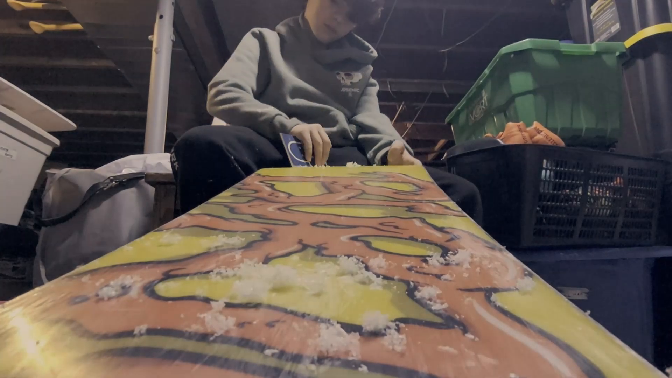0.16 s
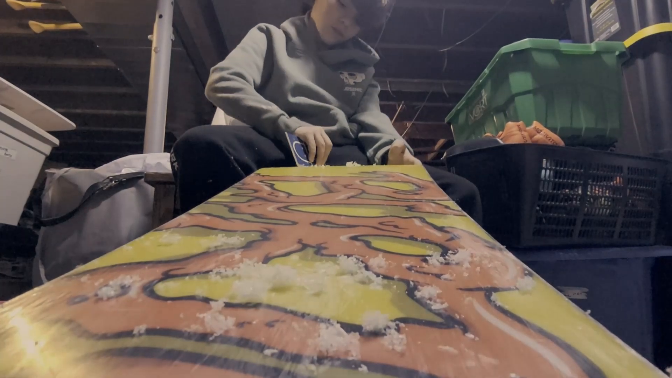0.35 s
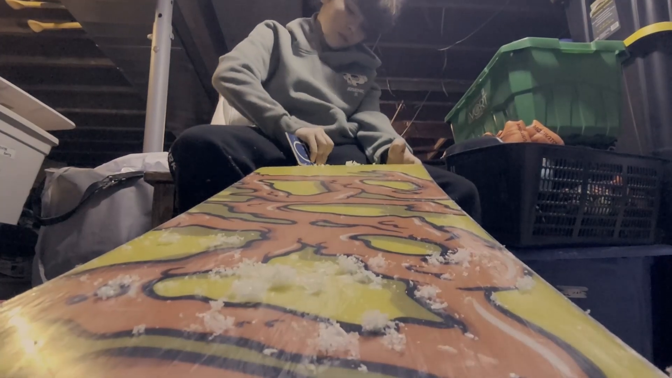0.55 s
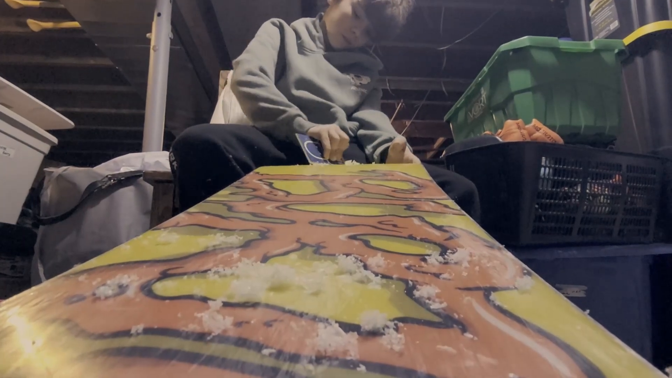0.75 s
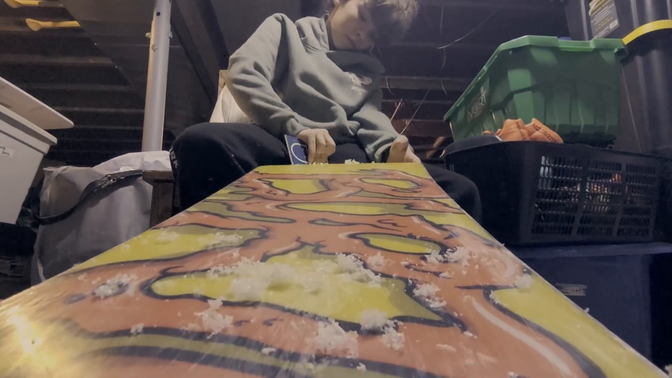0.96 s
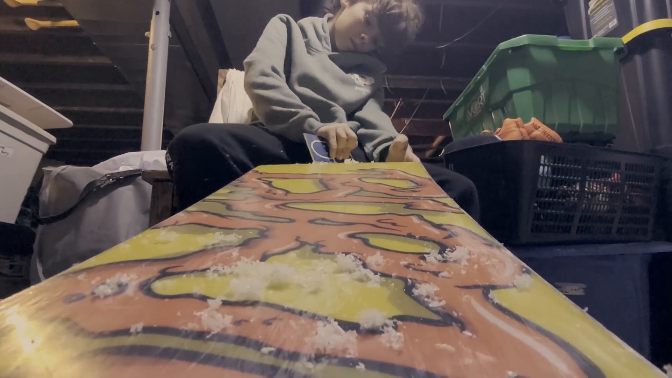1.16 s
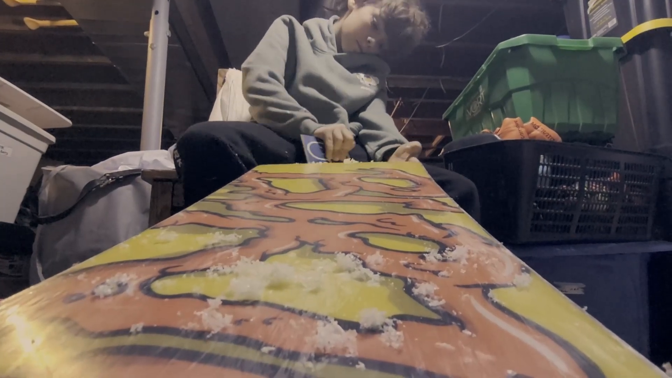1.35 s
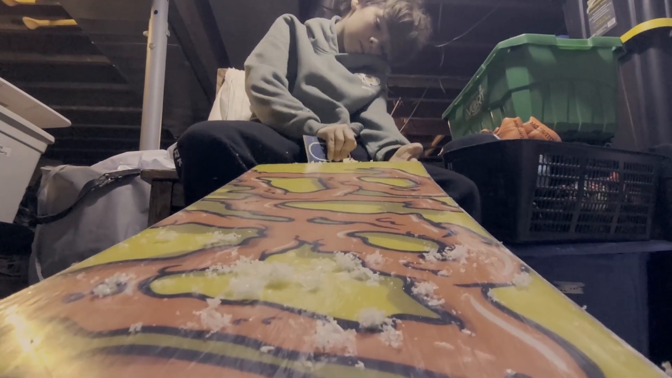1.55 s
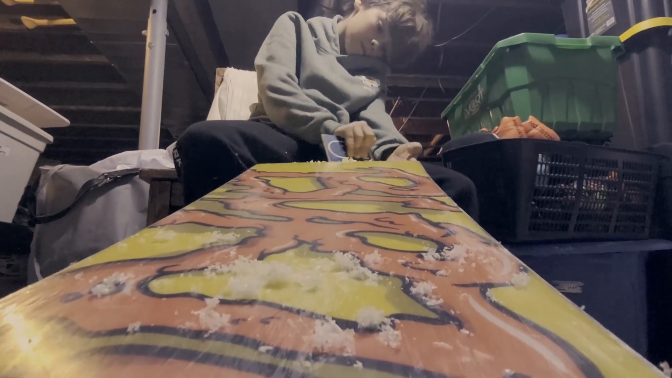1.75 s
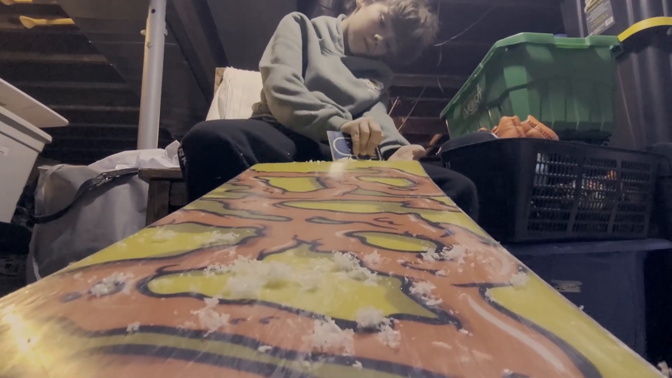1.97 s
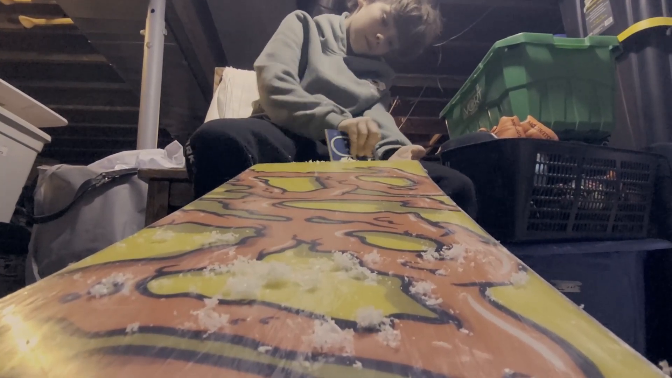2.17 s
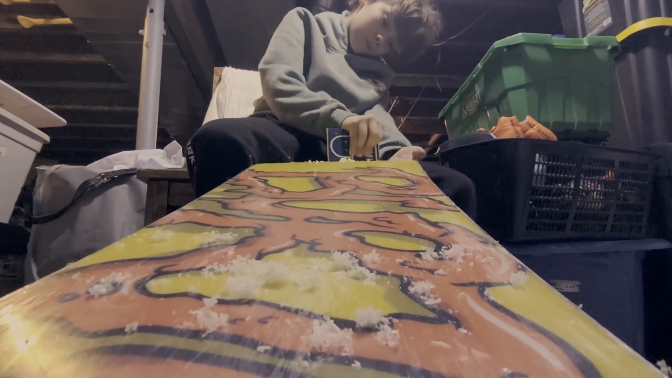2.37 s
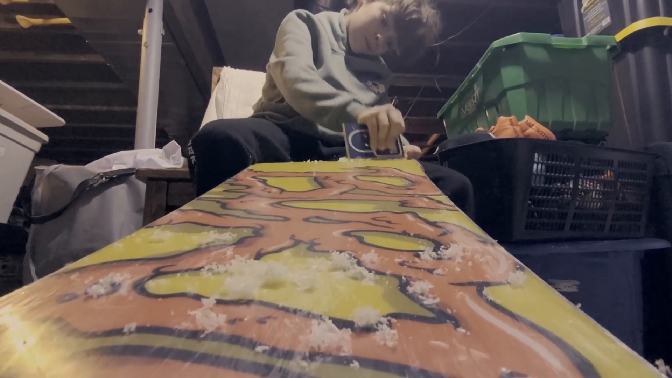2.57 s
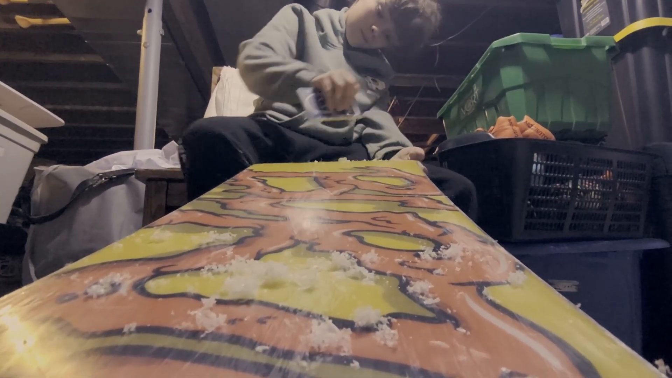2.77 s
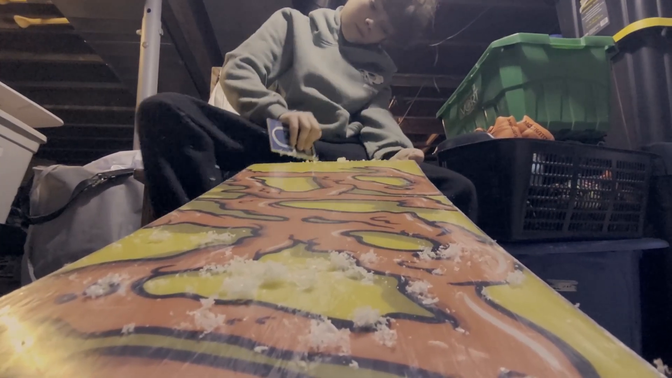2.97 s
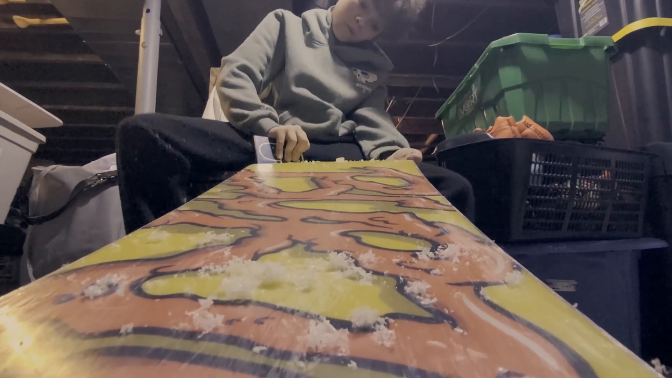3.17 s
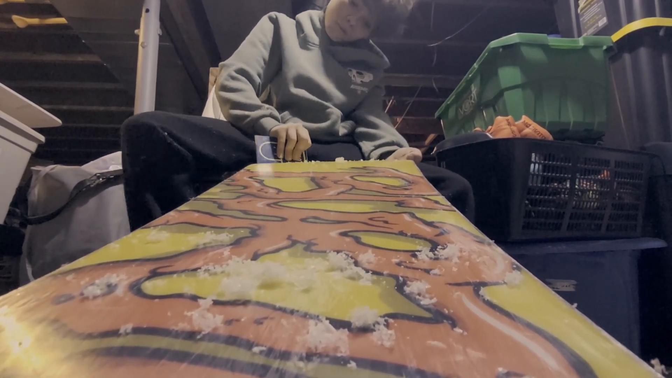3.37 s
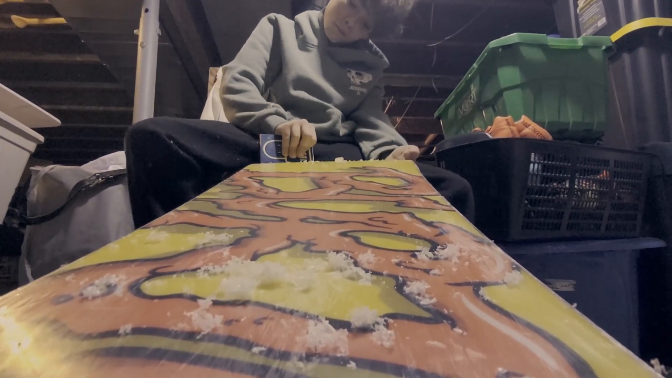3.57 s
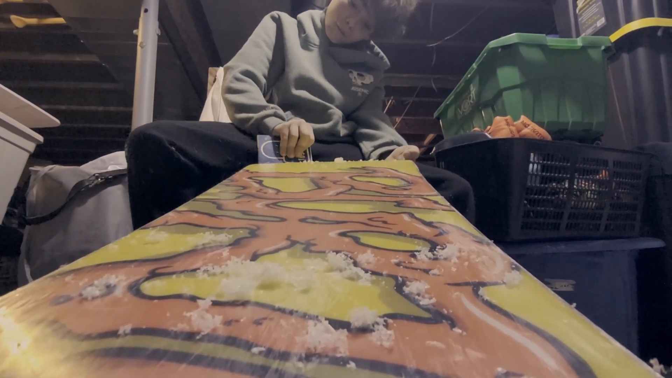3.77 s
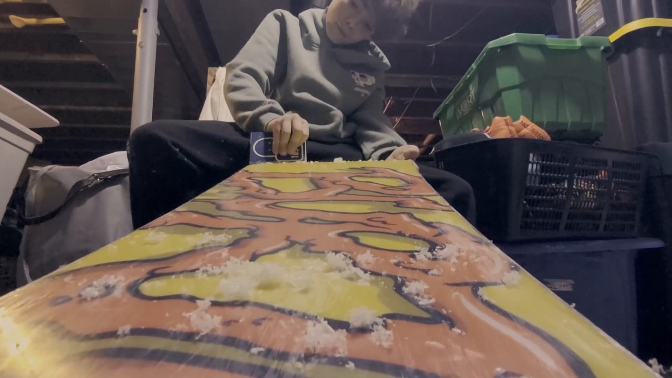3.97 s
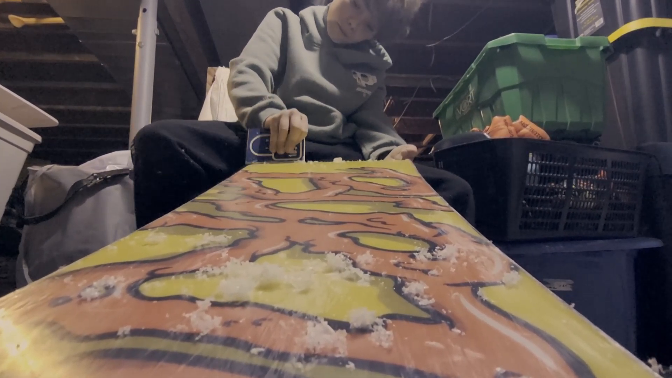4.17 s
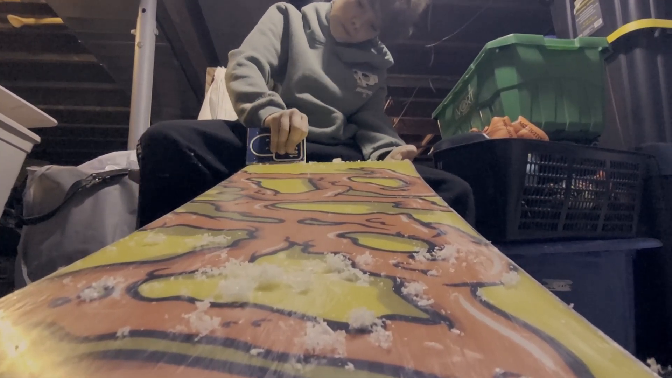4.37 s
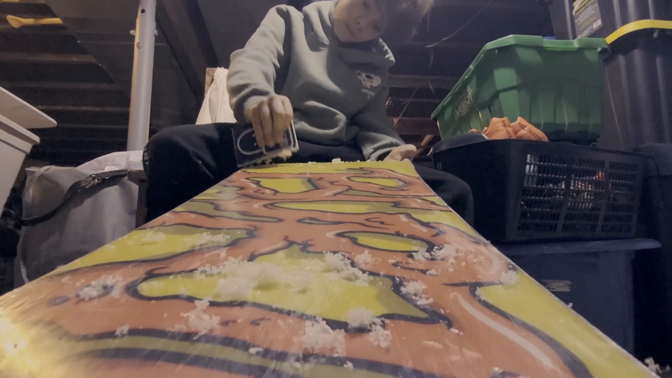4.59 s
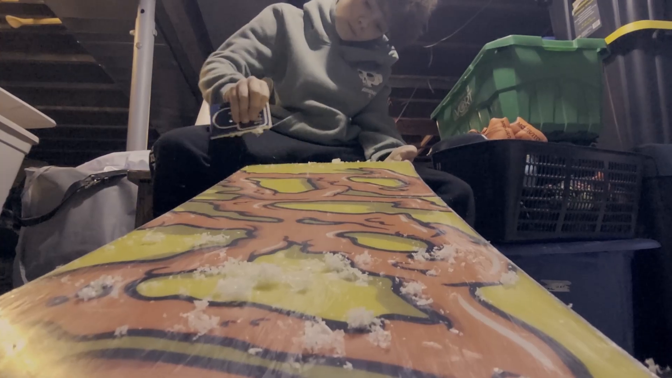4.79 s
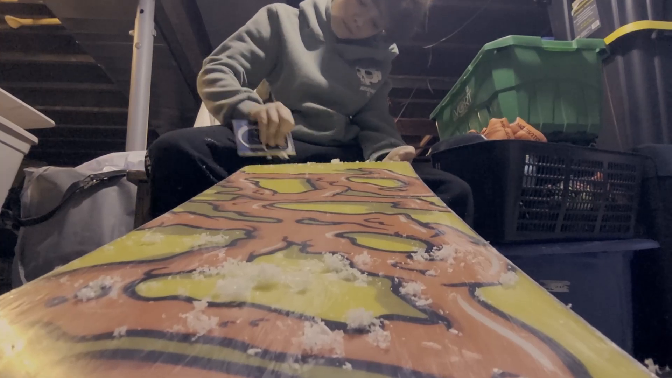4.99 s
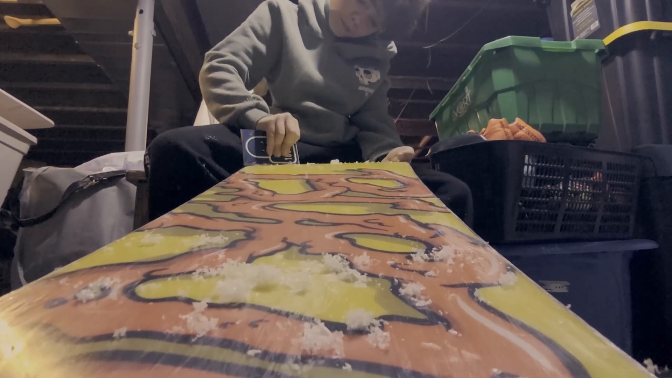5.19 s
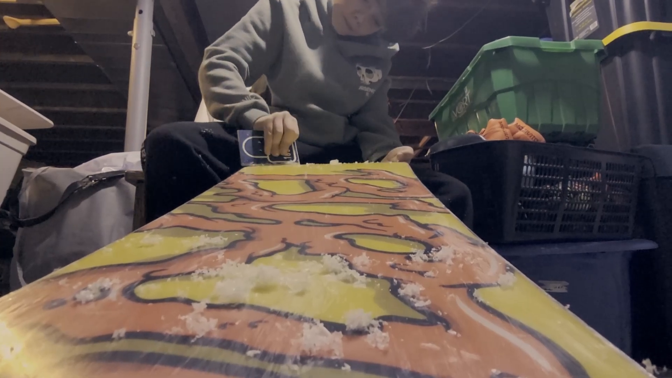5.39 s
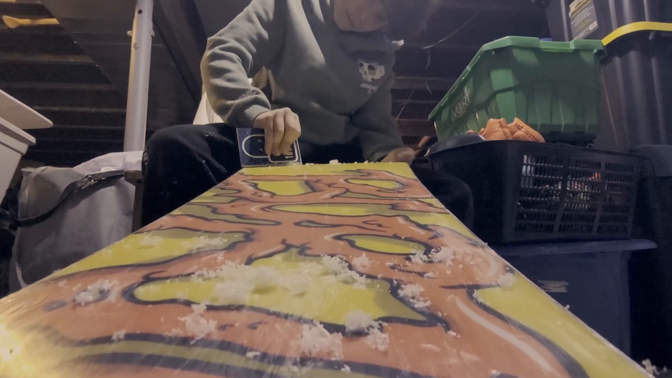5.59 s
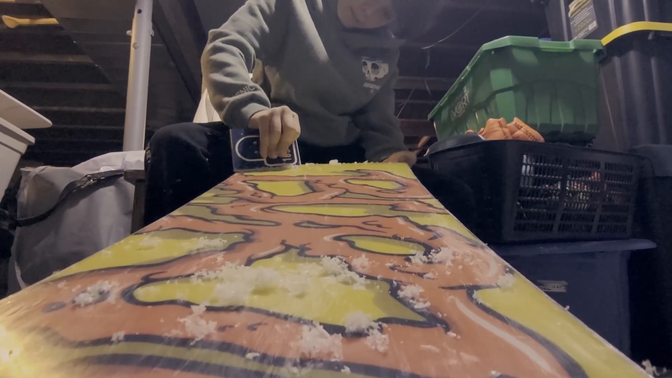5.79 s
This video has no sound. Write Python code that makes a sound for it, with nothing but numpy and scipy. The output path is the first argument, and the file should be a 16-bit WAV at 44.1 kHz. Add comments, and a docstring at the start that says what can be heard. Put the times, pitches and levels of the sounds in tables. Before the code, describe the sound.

Dry, hollow scraping strokes on a waxy board swell, fade and return rougher, with two sharp clacks between them.

```python
"""A plastic scraper is worked back and forth over the waxed base of a snowboard in a garage.
Small knocks and faint strokes at the board's edge come first, then strong strokes towards its middle.
Light strokes lead to a hard knock at 3.1 s as the scraper is set down; the work then moves back to the edge.
A second hard knock at 5.1 s precedes the last strokes. Stick-slip friction drives the blade's rasp, the hiss
of flakes and the board's ringing and rocking; blows, cracking wax, room echo and air are added to it."""
import sys
import numpy as np
from scipy import signal
from scipy.fft import rfft, irfft, next_fast_len
from scipy.io import wavfile
from scipy.ndimage import uniform_filter1d, map_coordinates

SR = 44100
rng = np.random.default_rng(int(sys.argv[2]) if len(sys.argv) > 2 else 0)


def dump(signal):
    """Clip the signal to [-1, 1] and save it as 16-bit WAV at the path in sys.argv[1]."""
    limited = np.clip(np.atleast_2d(signal).T, -1, 1)
    pcm = np.round(limited * 32767).astype(np.int16)
    wavfile.write(sys.argv[1], SR, pcm)


N = 257534  # samples

# Levels in the tables are relative, ahead of layer gains and microphone-port gains.
# steady room noise: hz, level_db
AIR_SPECTRUM = [(15, -44), (25, 2), (80, -5.5), (531, -17.5), (775, -19), (1130, -24.5), (2280, -23.5),
                (2840, -17), (4490, -20), (16000, -35.5)]
# reverberation of the garage: hz, t60_s
GARAGE_DECAY = [(100, 0.8), (500, 0.35), (2000, 0.27), (6000, 0.26), (14000, 0.25)]
# the two microphone ports: hz, coherence, left_over_right_db, left_lead_rad
PORT_RELATIONS = [(40.24, 0.36, -12.5, -1), (99, 0.71, -11.5, 1.75), (203, 0.26, -4, -1.5),
                  (322, 0.97, 2, -1.23), (460, 0.94, 5.5, -0.3), (750, 0.9, 2, 0.6), (1140, 0.8, 2.5, 2),
                  (1700, 0.24, 4.5, 2.5), (2400, 0.69, 6, 1.5), (3400, 0.19, 11.5, 1.8),
                  (4060, 1, 12.5, 1.56), (7000, .15, 3.5, 1.5), (10000, 0.11, 5.5, -0.9),
                  (14000, .1, -4, 8.5)]
# the board tips on its supports under the hand: start_s, level_db, pitch_hz
SUPPORT_THUMPS = [(.107, -35.5, 333), (.124, -43, 188), (0.284, -44.5, 106), (.695, -31, 113),
                  (.765, -40, 75.4), (1.395, -38, 111), (1.725, -29, 120), (1.79, -39.5, 45),
                  (2.055, -40, 65.5), (2.325, -36, 46.4), (3.69, -40, 75), (3.885, -34.5, 115.6),
                  (4.175, -29.5, 117), (4.454, -32, 81)]
# the slowly moving blade stutters: start_s, length_s, level_db, slips_per_s, pitch_hz
STUTTERS = [(3.363, .07, -44, 70, 1750), (3.476, .05, -46.5, 70, 1770), (4.635, .11, -51.5, 69, 736)]
# wax chips snap off: start_s, peak_db, pitch_hz
WAX_CHIPS = [(1.577, -16.5, 11200), (1.577, -17.5, 2380), (2.168, -27, 11100), (2.325, -40, 8950),
             (2.326, -30.5, 3500), (2.658, -50.5, 12000), (3.110, -38.5, 5850), (3.146, -40, 5500),
             (3.211, -42, 7000), (3.982, -50, 5970), (4.021, -42, 5980), (4.239, -40.5, 6000),
             (4.716, -41.5, 2000), (4.778, -50, 2500), (4.789, -42, 2500), (5.083, -30.5, 4920),
             (5.095, -40, 9100)]
# the scraper strikes the board: start_s, level_db, contact_cutoff_hz, boom_db, clatter_db,
# free_share (of each mode's t60, left by the damping hands)
BLOWS = [(0.089, -45.5, 900, -11, 5, 0.93), (0.11, -33, 450, -8, 10, 0.58), (0.159, -41, 400, -5, 8, 0.97),
         (0.271, -37, 550, -10, 9.5, 0.29), (3.1093, -11, 2130, -29, -19, 0.56),
         (3.21, -40, 600, 15, 4.5, 1), (3.981, -47.5, 3640, -18.5, 12, .7),
         (4.039, -31, 1520, -33, -5, 0.74), (4.298, -40, 1110, -19.5, -1.5, 0.93),
         (4.399, -25.5, 1510, -19, -1.5, 0.62), (4.441, -19.5, 1520, -11, -0.5, 0.49),
         (4.564, -37.5, 1190, -29.5, 5, 0.79), (5.0843, -13, 2600, 0, -2.5, 0.76),
         (5.105, -24, 1090, 7, -10, 0.78)]
# modes of the struck board: hz, middle_db, edge_db, t60_s (undamped by the hands)
STRUCK_MODES = [(78, -19.5, 6, 0.27), (120, -17, 10.5, 0.36), (188, -17, -1.5, 0.18),
                (212, -28.5, -3.5, 0.56), (293, -20, -7, 0.43), (364, -12.5, 5.5, 0.11),
                (448.5, -2, 1, 0.16), (591, -3.5, -10, 0.16), (704, -13.5, -1.5, 0.14),
                (768, -7.5, 3, 0.19), (840, -33.5, -5.5, 0.11), (1008, -23, 6.5, 0.091),
                (1143, -8, 10.5, 0.082), (1490, -5.5, -27, 0.12), (1680, -3.5, -11.5, 0.055),
                (2030, -18, -0.5, 0.14)]
# the board's dense higher modes: hz, t60_s
CLATTER_DECAY = [(300, 0.22), (900, .13), (2000, 0.061), (6000, 0.087), (14000, 0.15)]
# scraper strokes, pushes and lighter returns: start_s, rise_s, fall_s, rasp_db, ring_db, rock_db, hiss_db,
# bite_hz (band favoured by the blade's angle), spot_hz (band fed by the contact spot)
SCRAPER_STROKES = [(0.078, 0.018, 0.073, -49.5, -48, -53.5, -60, 2800, 350),
                   (0.15, 0.008, 0.11, -57.5, -55.0, -57, -69.5, 2500.0, 330.0),
                   (0.248, 0.03, 0.18, -56, -51.5, -54.5, -69.5, 2820, 335),
                   (0.545, 0.045, 0.07, -48, -46.5, -58, -83, 2110, 483),
                   (0.63, 0.12, 0.099, -34, -32.5, -39, -59.5, 2400, 460),
                   (0.85, 0.11, 0.056, -38.0, -44.0, -55, -56.5, 2480, 460),
                   (1.029, 0.074, 0.12, -28, -31.5, -46, -52.5, 2400, 1130),
                   (1.205, 0.086, 0.053, -38, -41, -44.5, -58, 2620, 467),
                   (1.336, 0.052, 0.094, -28.5, -35, -45, -54, 2400, 484),
                   (1.487, 0.064, 0.068, -41.5, -40.5, -48, -60.5, 1870, 454),
                   (1.62, 0.084, 0.068, -26.5, -31.5, -41.5, -55, 3360, 470),
                   (1.763, 0.076, 0.061, -37.0, -43.5, -49, -56, 4080, 460),
                   (1.895, 0.078, 0.064, -25, -35, -49, -51, 3650, 483),
                   (2.037, 0.077, 0.043, -34.0, -45, -56, -55, 3700, 500),
                   (2.155, 0.058, 0.12, -27.5, -36.5, -52.5, -54.5, 3650.0, 540),
                   (2.3, 0.12, 0.027, -37, -45.5, -55.5, -59, 3400, 530),
                   (2.469, 0.038, 0.14, -29, -36, -48, -51, 3700, 790),
                   (2.645, 0.11, 0.087, -51.5, -56, -68, -66.5, 3520, 790),
                   (2.819, 0.024, 0.084, -61, -59.0, -72, -69, 3560, 780.0),
                   (2.931, 0.015, 0.036, -65, -52, -60, -50.5, 3520, 785),
                   (2.955, 0.0088, 0.16, -60.5, -57.5, -73, -62.5, 3500.0, 784),
                   (3.178, 0.032, 0.11, -60, -57.5, -58.5, -74, 3020, 483),
                   (3.33, 0.031, 0.064, -59.5, -55, -65, -78, 2500, 480),
                   (3.462, 0.025, 0.028, -65, -64, -70.5, -83, 2500, 480),
                   (3.517, 0.037, 0.094, -39.5, -34.5, -57, -72.5, 2730, 487),
                   (3.555, 0.076, 0.083, -33.5, -36, -49, -63.5, 2220, 497),
                   (3.705, 0.069, 0.046, -53, -53, -58, -77.5, 2470, 503),
                   (3.815, 0.047, 0.1, -34.5, -36, -40.5, -58, 3280, 490),
                   (3.965, 0.07, 0.053, -47.5, -49, -47.5, -70.5, 2600, 1080),
                   (4.097, 0.052, 0.09, -34, -38, -34, -58.5, 1930, 900),
                   (4.225, 0.057, 0.092, -49.5, -50, -46.5, -71.5, 2180, 800),
                   (4.383, 0.018, 0.078, -38, -37, -34, -68.5, 1600, 780),
                   (4.43, 0.083, 0.048, -41.5, -48.5, -42.5, -63.5, 2900, 700),
                   (4.635, 0.12, 0.13, -59.5, -61, -85.5, -82.5, 2660, 480.0),
                   (4.874, 0.039, 0.074, -70.5, -81, -81.5, -74, 2700.0, 477),
                   (5.242, 0.048, 0.051, -75, -73, -72, -70.5, 2700.0, 450.0),
                   (5.318, 0.054, 0.22, -42, -46, -41, -62, 2700, 430),
                   (5.47, 0.019, 0.21, -58.5, -62.5, -62, -61.5, 2680, 477),
                   (5.639, 0.067, 0.17, -44, -43.5, -38.5, -62, 2520, 530),
                   (5.745, 0.098, 0.08, -35, -35.5, -46, -59.5, 3100.0, 520.0)]
# where the blade works: time_s, edge_share (0 = middle of the board, 1 = its edge)
CONTACT_PATH = [(0, 1), (.6, 0.22), (3.6, 0.068), (4.1, 0.97), (5.8, 0.63)]
# the grip changes for a moment in uneven wax: peak_s, extra_db, spread_s (standard deviation)
GRIP_CHANGES = [(0.74, 2, .004), (1.082, 4.5, .01), (1.299, 4, .009), (1.365, 8.5, 0.0025),
                (1.698, 2.5, 0.0044), (1.824, 6, 0.0024), (2.01, -3, 0.00475), (2.378, 5, 0.0029),
                (2.537, 5, .01), (3.556, 4, 0.0013), (4.04, 8.5, 0.0026), (4.057, 3, .003),
                (4.116, 6.5, 0.005), (4.199, 2.5, 0.0027), (4.164, 9, 0.0023), (4.451, -1, .004),
                (5.343, 3, .005), (5.507, 8, 0.008)]
# resonances of the board under the blade, middle and edge: hz, width_hz, level_db
MIDDLE_RESONANCES = [(290, 20, -16.5), (451.5, 21.6, 5.5), (545, 28, -6), (568, 25, -5.5),
                     (679.6, 24, -7.5), (787, 35, -3), (1012, 38, -13.5), (1112, 56, -8)]
EDGE_RESONANCES = [(307, 220, -3), (386, 27, 1.5), (420, 29, 3), (578.4, 96, -0.5), (740.5, 30, -1.5),
                   (864, 91, -10), (1000, 34, -7.5), (1174, 87, -9.5)]
# resonances of the blade: hz, width_hz, level_db
BLADE_RESONANCES = [(1510, 77, -6), (1890, 110, -12), (2460, 23, 3.5), (2500, 110, -1), (3260, 28, -5),
                    (3570, 47, -10), (3280, 37, -19.5), (4060, 50, -12), (5430, 83, -15.5)]
# slow bending modes of the whole board: hz, width_hz, level_db
BENDING_MODES = [(44.1, 28, -1.5), (79, 18.2, 1.5), (117, 20.7, -1), (178.3, 76, -9)]
# friction spectra of the rasp at middle and edge, of the hiss, the ring and the rocking: hz, level_db
RASP_MIDDLE_SPECTRUM = [(600, -17.5), (1100, -9.5), (1400, 1.5), (2300, 1.5), (3300, -1), (4300, -4.5),
                        (5300, -4.5), (6100, -19), (7400, -15), (8500, -36), (12000, -53.5)]
RASP_EDGE_SPECTRUM = [(600, -16.5), (1100, 0), (1400, -4.5), (2200, -5), (3300, -5.5), (4300, -9),
                      (5300, -10), (6100, -19), (7400, -24.5), (8500, -33.5), (12000, -50)]
HISS_SPECTRUM = [(1500, -2.5), (4000, -2.5), (6500, 2), (8600, -9), (10500, -4), (13000, -2.5), (15800, -6)]
RING_SPECTRUM = [(80, -50.5), (230, 5), (380, -6), (1200, 4.5), (1700, -9), (3000, -56.5)]
ROCK_SPECTRUM = [(20, -22.5), (40, -7), (70, -2), (150, -1.5), (230, -5), (400, -34.5)]

TOP_HZ = 16050  # upper band limit
THUMP_RISE_CYCLES = 0.99  # a thump's envelope peaks after this many cycles
CREAK_RING_CYCLES = 3.8  # cycles in which a slip's ringing falls by a factor e
PUSH_HZ = 1250  # the scraper's edge springs back in about one cycle
# each layer's amplitude grows as this power of the blade's speed
RASP_LAW, RING_LAW, ROCK_LAW, HISS_LAW = 1.73, 0.96, 1, 2.1
# how well each layer reaches the microphones (dB)
RASP_DB, RING_DB, ROCK_DB, HISS_DB = -1.5, -2.5, -1.5, 8.5
# how long the board's ring, its rocking and the loose flakes take to follow the blade (s)
RING_LAG_S, ROCK_LAG_S, HISS_LAG_S = 0.0043, 0.026, .003
LOOSE_DB, LOOSE_S = -15, .04  # loose flakes rustle on while the blade turns round
BITE_SAG_OCT_PER_S = 1.2  # the blade tilts as a stroke goes on, and its favoured band sinks
# the treble opens with speed (dB) and wax (dB per dB of hiss over rasp, relative to the usual)
TREBLE_HZ, TREBLE_SPEED_DB, TREBLE_PER_WAX, USUAL_WAX_DB = 4500, 4.5, 0.75, -25
EDGE_LEAN_DB = 0.5  # work at the board's edge leans further to the left


def amp(db):
    """Definition of level: decibels to amplitude ratio."""
    return 10 ** (np.asarray(db) / 20)


def unit(x):
    """Normalisation of power: scale to rms 1."""
    return x / np.sqrt(np.mean(x ** 2) + 1e-20)


def along(points, hz, axis=1):
    """Logarithmic frequency scale: interpolate one column of a table on it."""
    table = np.transpose(points)
    return np.interp(np.log(hz + 1), np.log(table[0] + 1), table[axis])


def edge_share(t):
    """Linear motion between contact points: share of the board's edge at time t."""
    return np.clip(np.interp(t, *np.transpose(CONTACT_PATH)), 0, 1)


def wobble(rate):
    """Band-limited random modulation: a smooth curve with rate knots a second."""
    knots = rng.standard_normal(int(N * rate / SR) + 4)
    return map_coordinates(knots, [np.arange(N) * rate / SR])


def filtered(x, response):
    """Linear filtering: multiply the spectrum by a complex response of frequency."""
    n = x.shape[-1]
    m = next_fast_len(n + SR // 4, True)
    return irfft(rfft(x, m) * response(np.fft.rfftfreq(m, 1 / SR)), m)[..., :n]


def butter(x, order, cutoff_hz, kind='low'):
    """Causal Butterworth filtering."""
    return signal.sosfilt(signal.butter(order, cutoff_hz, kind, fs=SR, output='sos'), x)


def resonances(modes, hz):
    """Modal superposition: damped resonators of alternating sign."""
    return sum((-1) ** k * amp(db) * 1j * hz * width / (centre ** 2 - hz ** 2 + 1j * hz * width)
               for k, (centre, width, db) in enumerate(modes))


def dying(t60s, length):
    """Frequency-dependent exponential decay of stereo noise."""
    hz, t, z = signal.stft(rng.standard_normal((2, length)), SR, nperseg=256)
    decay = 10 ** (-3 * t / along(t60s, hz)[:, None])
    return signal.istft(z * decay, SR, nperseg=256)[1][:, :length]


def add(track, s, sound):
    """Linear superposition: mix a sound in at time s."""
    part = track[..., round(s * SR):][..., :sound.shape[-1]]
    part += sound[..., :part.shape[-1]]


def lean(left_db):
    """Interaural level difference: opposite gains move a sound towards the left port."""
    return amp(np.array([[1], [-1]]) * left_db / 2)


def ports(pair, colour):
    """Partial coherence: shared and diffuse signals meet two ports with level and phase differences."""
    def coherent_split(hz):
        turn = np.arccos(np.clip(along(PORT_RELATIONS, hz), 0, 1)) / 2
        return colour(hz) * np.array([np.cos(turn), np.sin(turn)])

    def port_response(hz):
        level = amp(along(PORT_RELATIONS, hz, axis=2) / 2)
        left = level * np.exp(.5j * along(PORT_RELATIONS, hz, axis=3))
        return left ** np.array([[1], [-1]])  # the right port is the inverse

    shared, diffuse = filtered(pair, coherent_split)
    return filtered(np.array([shared + diffuse, shared - diffuse]), port_response)


def record(dry):
    """Band limitation: nothing passes at or above TOP_HZ."""
    return filtered(dry, lambda hz: hz < TOP_HZ)


def air():
    """Stationary broadband noise: the faint steady rush of the room."""
    noise = rng.standard_normal((2, N))
    return amp(-71.5) * unit(filtered(noise, lambda hz: amp(along(AIR_SPECTRUM, hz))))


def garage(x):
    """Diffuse reverberation: convolve with a decaying noise tail of the cluttered room."""
    tail = dying(GARAGE_DECAY, SR // 2)
    delayed = np.pad(x.mean(0), (SR // 100, 0))  # 10 ms
    return signal.fftconvolve(delayed[None], tail / np.linalg.norm(tail[0]), axes=1)[:, :N]


def thumps():
    """Low-frequency transient oscillation: soft thuds of the board on its supports."""
    track, t = np.zeros((2, N)), np.arange(SR // 3) / SR
    for s, db, hz in SUPPORT_THUMPS:
        u = t * hz / THUMP_RISE_CYCLES
        envelope = (u * np.exp(1 - u)) ** 2
        add(track[0], s, amp(db) * envelope * np.sin(2 * np.pi * hz * t))
    return ports(track, np.ones_like)


def creaks():
    """Slow stick-slip: runs of ringing slips, slightly uneven in time and size."""
    track, t = np.zeros((2, N)), np.arange(SR // 25) / SR
    for start, length, db, rate, hz in STUTTERS:
        envelope = np.exp(-t * hz / CREAK_RING_CYCLES) * (1 - np.exp(-t * hz))
        slip = np.sin(2 * np.pi * hz * t) * envelope
        chance = rng.standard_normal((32, 2))
        for s, (late, size) in zip(np.arange(start, start + length, 1 / rate), chance):
            add(track[0], s + .08 * late / rate, amp(db + 2 * size) * slip)
    return ports(track, np.ones_like)


def chips():
    """Brittle fracture: wax cracks off in dry, band-limited noise bursts."""
    track, t = np.zeros((2, N)), np.arange(SR // 20) / SR
    for s, db, hz in WAX_CHIPS:
        decay = np.exp(-t / 0.0012) + .06 * np.exp(-t / 0.012)
        crack = rng.standard_normal((2, len(t))) * decay
        tick = butter(crack, 1, [.7 * min(hz, 14000), min(1.3 * hz, 18000)], 'band')
        add(track, s, amp(db) * tick / np.abs(tick).max())
    return track


def knocks():
    """Impact excitation: a push, modes and dense clatter, low-passed by the softness of the contact."""
    track, t = np.zeros((2, N)), np.arange(SR // 2) / SR
    after_push = t - .0012
    for s, db, cutoff_hz, boom_db, clatter_db, free in BLOWS:
        edge = edge_share(s)
        ring = np.zeros((2, len(t)))
        for hz, middle_db, edge_db, t60 in STRUCK_MODES:
            chance_db = rng.normal(0, 1.5, (2, 1))
            level = (1 - edge) * middle_db + edge * edge_db + boom_db * (hz < 200) + chance_db
            # each mode takes about a cycle to build up
            envelope = amp(level - 60 * t / (free * t60)) * (1 - np.exp(-t * hz))
            ring += envelope * np.sin(2 * np.pi * hz * t)
        push = np.sin(2 * np.pi * PUSH_HZ * after_push) * np.exp(-(after_push / 0.0003) ** 2)
        push = push * [[1], [.4]]  # shared, diffuse
        # the free edge clatters lower than the stiff middle
        lowest_hz = 440 * (1 - edge) + 270 * edge
        clatter = butter(dying(CLATTER_DECAY, len(t)), 4, lowest_hz, 'high')
        blow = 1.01 * push + 0.22 * ring + 1.38 * amp(clatter_db) * clatter
        add(track, s, amp(db) * butter(blow, 3, min(cutoff_hz, SR / 3)))
    return ports(track, np.ones_like)


def friction(colour, slips_per_s, spread_db, smooth):
    """Stick-slip friction: uneven slips and smooth sliding noise drive a body; the centre has rms 1."""
    size_db = spread_db * np.clip(rng.standard_normal(N), -2, 2)
    sizes = (rng.random(N) < slips_per_s / SR) * amp(size_db)
    slips = unit(sizes * rng.choice([-1, 1], (2, N)))
    pair = ports(slips + smooth * rng.standard_normal((2, N)), colour)
    return pair / pair.mean(0).std()


def blade_friction(spectrum):
    """Forced vibration of the blade: direct sound plus its resonances."""
    def colour(hz):
        return amp(along(spectrum, hz)) * (1.4j + resonances(BLADE_RESONANCES, hz))
    return friction(colour, slips_per_s=1500, spread_db=2.0, smooth=0.83)


def board_friction(modes):
    """Forced vibration of the board: friction through its local resonances."""
    def colour(hz):
        return amp(along(RING_SPECTRUM, hz)) * resonances(modes, hz)
    return friction(colour, slips_per_s=600, spread_db=1, smooth=0.48)


def flake_friction():
    """Granular friction: many small slips of the wax flakes make a hiss."""
    return friction(lambda hz: amp(along(HISS_SPECTRUM, hz)), slips_per_s=3300, spread_db=-1.5, smooth=1.0)


def rocking_friction():
    """Forced bending: the hand's push rocks the whole board."""
    def colour(hz):
        return amp(along(ROCK_SPECTRUM, hz)) * resonances(BENDING_MODES, hz)
    return friction(colour, slips_per_s=300, spread_db=0, smooth=0.63)


def travelling(x, favoured, octaves, favoured_db, patchy_db):
    """Moving-point excitation: the contact feeds changing standing waves, most near the favoured band."""
    hz, t, z = signal.stft(x, SR, nperseg=1024, noverlap=768)
    centre_hz = np.interp(t, *np.transpose(favoured))
    bell = np.exp(-.5 * (np.log2((hz[:, None] + 1) / centre_hz) / octaves) ** 2)
    patches = uniform_filter1d(rng.standard_normal(z.shape[1:]), size=2, axis=0)
    patches = uniform_filter1d(patches, size=14, axis=1)
    gain = amp(favoured_db * bell + patchy_db * unit(patches))
    # only the colour moves: the expected power stays the same
    power = np.mean(np.abs(z) ** 2, axis=(0, 2))[:, None]
    gain /= np.sqrt((power * gain ** 2).sum(0) / power.sum())
    return signal.istft(z * gain, SR, nperseg=1024, noverlap=768)[1][:, :N]


def favoured_band(centres_hz, sag):
    """Contact-angle tuning: (s, Hz) path sinking by sag octaves a second through each stroke."""
    path = []
    for (start, rise, fall, *_), hz in zip(SCRAPER_STROKES, centres_hz):
        for dt in (-rise / 2, fall / 2):
            path.append((start + rise + dt, hz * 2 ** (-sag * dt)))
    return sorted(path)


def stroke_gain(peaks_db, law):
    """Power law of speed: in each stroke the blade speeds up from rest and slows to rest again."""
    t, power = np.arange(N) / SR, np.zeros(N)
    for (start, rise, fall, *_), db in zip(SCRAPER_STROKES, peaks_db):
        end = start + rise + fall
        on = slice(*np.searchsorted(t, [start, end]))
        progress = np.minimum((t[on] - start) / rise, (end - t[on]) / fall)
        speed = np.sin(np.pi / 2 * np.clip(progress, 0, 1))
        power[on] += (amp(db) * speed ** law) ** 2
    return np.sqrt(power)


def lagging(gain, lag_s):
    """Energy storage: power follows the drive with time constant lag_s."""
    keep = np.exp(-1 / (lag_s * SR))
    return np.sqrt(signal.lfilter([1 - keep], [1, -keep], gain ** 2))


def opened(rasp, speed, wax_db):
    """Speed-dependent brightness: the rasp is duller when the blade is slow or slides on bare base."""
    treble = filtered(rasp, lambda hz: 1 - 1 / (1 + (hz / TREBLE_HZ) ** 10))
    treble_db = TREBLE_SPEED_DB * (np.minimum(speed, 1) - 1)
    treble_db += np.clip(TREBLE_PER_WAX * (wax_db - USUAL_WAX_DB), -7, 2.5)
    return rasp + (amp(treble_db) - 1) * treble


def scraping():
    """Friction-driven vibration: strokes sound the blade and flakes, and ring and rock the board."""
    rasp_db, ring_db, rock_db, hiss_db, bite_hz, spot_hz = np.transpose(SCRAPER_STROKES)[3:]
    t = np.arange(N) / SR
    edge = edge_share(t)

    def by_place(middle, rim):
        return np.sqrt(1 - edge) * middle + np.sqrt(edge) * rim

    # uneven wax makes the grip flutter, more so at the edge
    grip_db = (1.0 + 0.76 * edge) * wobble(70) + 1.3 * wobble(300)
    for s, db, spread in GRIP_CHANGES:
        grip_db += db * np.exp(-.5 * ((t - s) / spread) ** 2)

    rasp = by_place(blade_friction(RASP_MIDDLE_SPECTRUM), blade_friction(RASP_EDGE_SPECTRUM))
    bite = favoured_band(bite_hz, BITE_SAG_OCT_PER_S)
    rasp = travelling(rasp, bite, octaves=0.2, favoured_db=3.5, patchy_db=4.0)
    # the hiss level over the rasp stands for the amount of wax cut
    peak_s = [start + rise for start, rise, *_ in SCRAPER_STROKES]
    wax_db = np.interp(t, peak_s, hiss_db - rasp_db)
    speed = stroke_gain(np.zeros(len(SCRAPER_STROKES)), 1)
    rasp = opened(rasp, speed, wax_db)

    ring = by_place(board_friction(MIDDLE_RESONANCES), board_friction(EDGE_RESONANCES))
    ring = travelling(ring, favoured_band(spot_hz, 0), octaves=0.53, favoured_db=6, patchy_db=4.0)

    rasp_gain = stroke_gain(rasp_db, RASP_LAW)
    ring_gain = lagging(stroke_gain(ring_db, RING_LAW), RING_LAG_S)
    rock_gain = lagging(stroke_gain(rock_db, ROCK_LAW), ROCK_LAG_S)
    cutting = stroke_gain(hiss_db, HISS_LAW)
    hiss_gain = np.hypot(lagging(cutting, HISS_LAG_S), amp(LOOSE_DB) * lagging(cutting, LOOSE_S))

    # a hard stroke comes through the board and leans left; a light touch leans back to the right
    left_db = np.clip(.2 * (20 * np.log10(rasp_gain + 1e-9) + 32.6), -5, 2.2) + EDGE_LEAN_DB * edge
    return (rasp_gain * amp(RASP_DB + grip_db) * rasp * lean(left_db)
            + ring_gain * amp(RING_DB + 0.39 * grip_db) * ring
            + hiss_gain * amp(HISS_DB + 0.18 * grip_db) * flake_friction() * lean(left_db - 0.4)
            + rock_gain * amp(ROCK_DB) * rocking_friction())


def scene():
    """Superposition of direct sound, reverberation and room noise."""
    strokes = scraping() + thumps() + creaks()
    blows = knocks() + chips()
    echo = garage(amp(-19) * strokes + amp(-14.0) * blows)
    return strokes + blows + echo + air()


dry = scene()
out = record(dry)
dump(out)
```